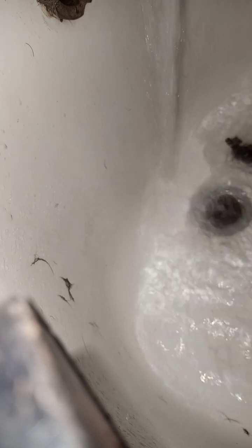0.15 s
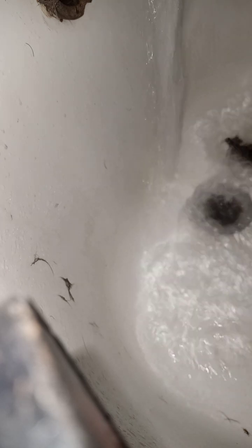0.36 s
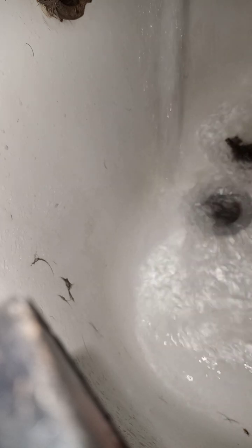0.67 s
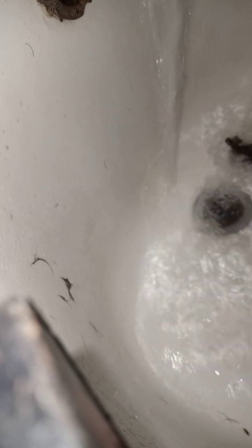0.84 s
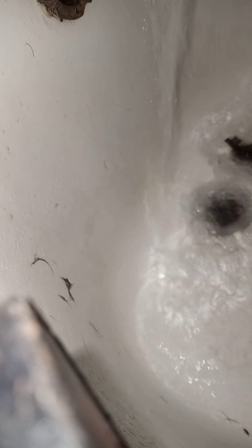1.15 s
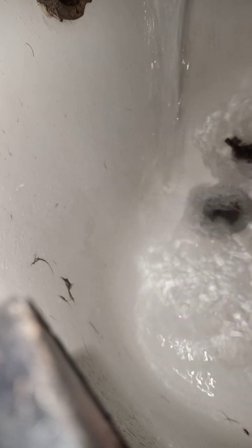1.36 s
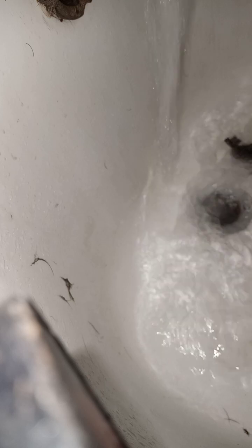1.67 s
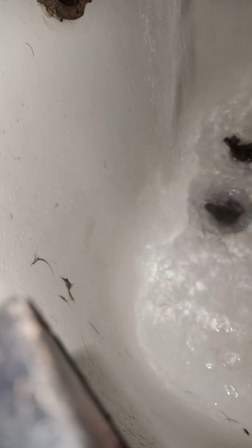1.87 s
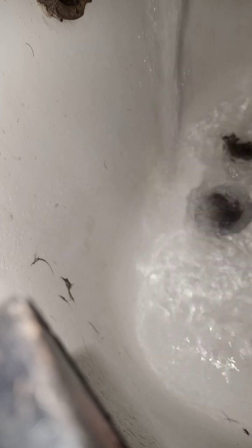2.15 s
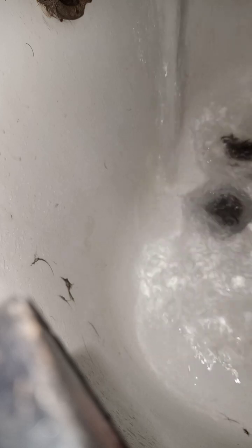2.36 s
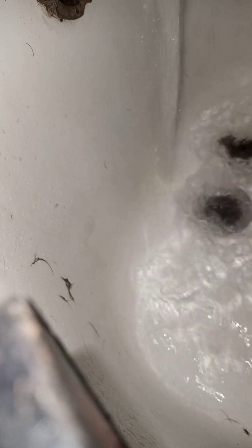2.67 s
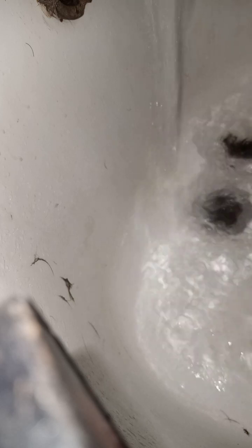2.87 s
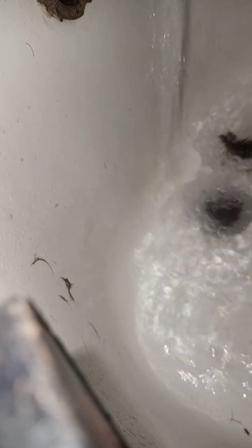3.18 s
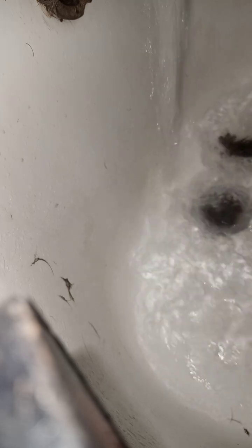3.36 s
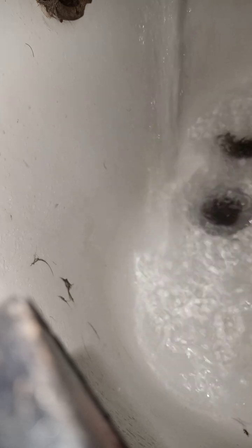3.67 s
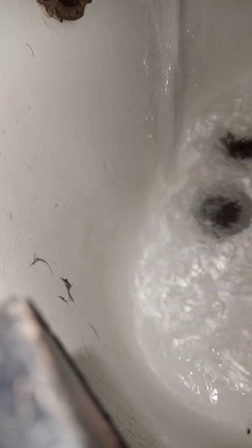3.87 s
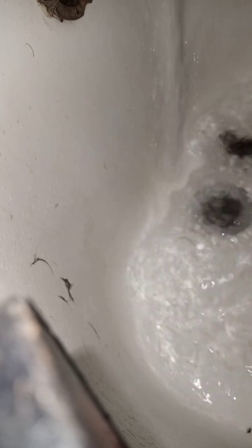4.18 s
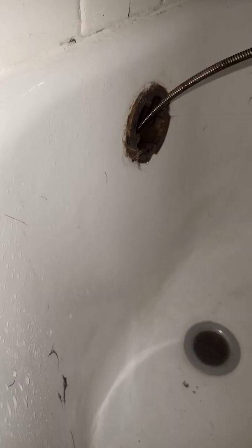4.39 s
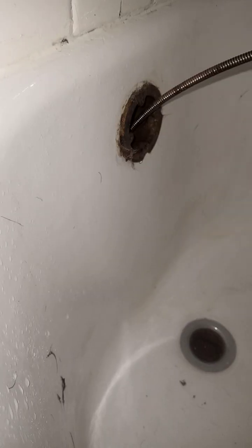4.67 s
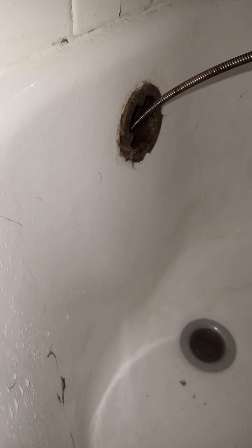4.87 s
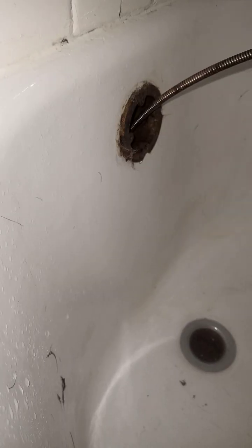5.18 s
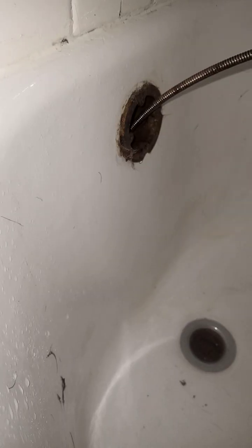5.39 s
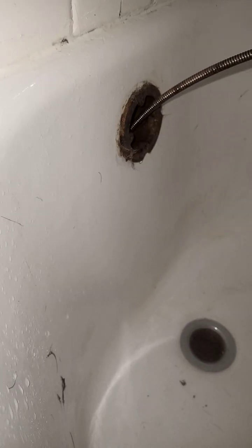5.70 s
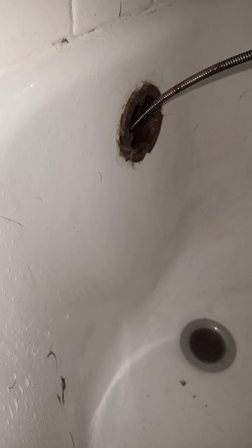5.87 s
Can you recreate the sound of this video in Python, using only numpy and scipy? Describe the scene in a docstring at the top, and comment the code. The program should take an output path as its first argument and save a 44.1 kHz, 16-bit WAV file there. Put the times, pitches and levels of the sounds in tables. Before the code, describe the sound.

A continuous rush of tap water fills the first four seconds, fizzy and dense, with popping bubbles, small gulps and a soft gurgling drain beneath. An abrupt cut leaves near silence and faint house rumble. A metal drain cable scrapes lightly over enamel, pauses, scrapes again, then knocks the tub wall several times with short tiled-room echo. Mono handheld microphone, close, slightly harsh in the treble.

```python
"""A tiled bathroom: water pours from a spout into a bathtub; a hard cut leads to the quiet room, tap shut.
The water is coloured noise for spray and splash, decaying sines for bubbles, and a humming, gurgling drain.
After the cut a steel drain cable scrapes (gritty noise) and knocks on the tub (noise bursts, sines).
Low house rumble and faint room air, both filtered noise, run throughout.
The microphone boosts part of the treble."""
import sys
import numpy as np
from scipy import signal
from scipy.fft import rfft, irfft, next_fast_len
from scipy.io import wavfile
from scipy.ndimage import uniform_filter1d, map_coordinates

SR = 44100
rng = np.random.default_rng(int(sys.argv[2]) if len(sys.argv) > 2 else 0)


def bounce(signal):
    """Save signal as a 16-bit WAV file at the path given by the first command-line argument."""
    frames = np.transpose(np.atleast_2d(signal))
    limited = np.clip(frames, -1, 1)
    pcm = np.round(limited * 32767).astype(np.int16)
    wavfile.write(sys.argv[1], SR, pcm)


N = 266364  # length of the sound [samples]
CUT_S = 3.929  # a cut ends the water scene; a quiet bathroom follows [s]

# how strongly the microphone picks up each pitch: (frequency [Hz], gain [dB])
MIC_GAIN = [(35, -5.5), (70, -2.5), (5000, -1.5), (5400, 5), (6100, 9.5), (6750, 6.5), (7100, -1),
            (8200, -8), (9800, -1.5), (11500, -9.5), (13000, -10.5), (13900, -17), (14600, -1.5),
            (15600, -1.5)]
# standing waves in the tub that water and knocks excite: (frequency [Hz], width [Hz], gain [dB])
TUB_WAVES = [(583, 11, -4.5), (753, 19, -12), (877, 30, -4.5), (1080, 17, -7.5), (1480, 33, -14.5),
             (2466, 35, -5.5), (3080, 30, -0.5), (3160, 93, -4.5), (3440, 19, -3), (3500, 24, -8),
             (3609, 22, -3), (3890, 21, -8)]
# moments when the drain gurgles louder, each led by one big bubble:
# (start [s], length [s], level [dB], bubble pitch [Hz])
DRAIN_GURGLES = [(0.008, 0.028, -45.5, 446), (0.315, 0.027, -44, 514), (0.523, 0.09, -43, 496),
                 (0.851, 0.026, -47, 504), (0.967, 0.048, -46.5, 490), (1.09, 0.028, -43, 492),
                 (1.312, 0.036, -47, 416), (1.398, 0.058, -47, 468), (1.975, 0.03, -46, 476),
                 (2.04, 0.059, -54.5, 464), (2.098, 0.04, -46.5, 444), (2.417, 0.045, -47.5, 434),
                 (2.515, 0.034, -45.5, 450), (2.685, 0.14, -45.5, 459), (3.132, 0.034, -49, 448),
                 (3.204, 0.12, -48, 450), (3.555, 0.3, -47.5, 430)]


def water():
    """Falling water excites the tub and the tiles; the drain sounds along, all until the cut."""
    falling = falling_water()
    in_tub = falling + filtered(falling, resonances(TUB_WAVES))
    near = in_tub + amp(-11.0) * tiles(falling) + drain() + pipe_note()
    after = np.maximum(np.arange(N) / SR - CUT_S, 0)
    # at the cut: a drop of 14 dB at once, then 60 dB more every 25 ms
    ending = np.where(after > 0, amp(-14.0 - 60 * after / .025), 1)
    return near * ending


def falling_water():
    """Spray and splash follow one unsteady flow, with single bursting bubbles and gulps of air on top."""
    # strength of the flow, before random wobble: (time [s], spray level [dB], splash level [dB])
    flow = [(0.0, -30, -38), (0.01, -26, -34), (0.14, -30, -43), (0.6, -27.5, -36), (0.64, -27, -43.5),
            (0.98, -29.5, -38.5), (1.2, -28.5, -42), (1.27, -29, -44), (1.31, -30, -39), (1.66, -28, -40.5),
            (2.13, -29, -37), (2.18, -30, -40), (2.19, -26.5, -33.5), (2.24, -28, -38.5),
            (3.76, -28.5, -38.5), (3.83, -27, -35), (3.9, -29, -43), (3.92, -30.5, -36.5)]
    spray_db, splash_db = curves(flow)
    churn = wobble(35)  # shared by spray and splash
    return spray(spray_db, churn) + splash(splash_db, churn) + pops() + gulps()


def spray(level_db, churn):
    """The hiss of the jet: a crowd of tiny bubbles mixed with patchy noise."""
    # tone of the spray: (frequency [Hz], gain [dB])
    spray_tone = [(1000, -28.5), (2200, -2), (2800, -11.5), (3400, -3), (5000, -2.5), (10000, -4),
                  (17000, -4)]
    fizz = froth(count=18000, low_hz=1940, high_hz=17170, cycles=2.51,
                 spread_db=3.5, most_db=14.0, size=160)
    hiss = unit(coloured(0.66 * fizz + 0.68 * patchy(2.3), spray_tone))
    flicker_db = 1.3 * wobble(11) + 0.66 * churn + 0.91 * wobble(120)
    return hiss * amp(level_db + flicker_db)


def splash(level_db, churn):
    """Lumpier, deeper water noise: larger bubbles mixed with patchy noise."""
    # tone of the splash: (frequency [Hz], gain [dB])
    splash_tone = [(120, -45), (200, -12.5), (278, -14.5), (369, -4.5), (399, -12.5), (432, -6), (473, -5),
                   (815, -4), (1070, 0.5), (1200, -5), (1570, 0.5), (1930, -6.5), (3000, -4.5),
                   (3900, -10.5), (6600, -120)]
    plops = froth(count=2500, low_hz=295.0, high_hz=3564, cycles=1.73,
                  spread_db=3.5, most_db=14.5, size=900)
    lumps = unit(coloured(0.38 * plops + 1.1 * patchy(2.5), splash_tone))
    flicker_db = 1.6 * wobble(12) + 1.2 * churn + 0.58 * wobble(25.07)
    return lumps * amp(level_db + flicker_db)


def pops():
    """Large bubbles burst, each a very short decaying sine."""
    # bursts: (time [s], peak level including the microphone's gain at that pitch [dB], pitch [Hz])
    bursts = [(0.0558, -15, 6400), (0.3018, -16.5, 5880), (0.5926, -17.5, 5850), (0.7043, -11, 6200),
              (0.8816, -15, 5850), (1.0058, -7.5, 6620), (1.0336, -10, 5700), (1.3114, -12.5, 5650),
              (1.5232, -11, 6310), (1.781, -12, 5800), (1.8826, -12.5, 6000), (2.288, -10.5, 6300),
              (2.354, -12.5, 6600), (2.587, -10.5, 6200), (2.789, -12, 5530), (3.037, -9.5, 5660),
              (3.1092, -11.5, 6100), (3.166, -10.5, 5800), (3.3463, -8, 6040), (3.4244, -10.5, 5730),
              (3.47, -8.5, 6210), (3.675, -11, 6280), (3.8864, -8, 5750)]
    s, db, hz = np.transpose(bursts)
    before_mic = amp(db - along(MIC_GAIN, hz))
    return bubbles(s, before_mic, hz, cycles=2.2, rise=0.0015, size=200)


def gulps():
    """Trapped air gulps, each a short decaying sine with a slightly rising pitch."""
    # gulps of trapped air: (time [s], peak level [dB], pitch [Hz])
    air_gulps = [(0.076, -25.5, 1550), (0.177, -20, 3250), (0.282, -23.5, 3620), (0.398, -16, 3440),
                 (0.431, -14, 3440), (0.502, -22, 2480), (0.539, -25.5, 1080), (0.723, -15.5, 4200),
                 (0.783, -28, 1590), (1.247, -13, 3510), (1.285, -18, 3170), (1.433, -19.5, 2550),
                 (1.547, -29, 1090), (1.734, -18.5, 3610), (1.832, -18, 3610), (1.867, -19.5, 1420),
                 (2.087, -21, 3080), (2.191, -15.5, 2200), (2.402, -26, 964), (2.463, -20.5, 1490),
                 (2.696, -26, 993), (2.774, -22, 1530), (3.075, -22, 1470), (3.316, -22.5, 977),
                 (3.418, -14.5, 3610), (3.625, -23, 2540), (3.92, -28.5, 1610)]
    s, db, hz = np.transpose(air_gulps)
    return bubbles(s, amp(db), hz, cycles=1.23, rise=0.0075, size=700)


def drain():
    """Noise makes the air in the pipe and tub hum; big bubbles lead the gurgles, over a lower hum."""
    # resonances of the air in pipe and tub: (frequency [Hz], width [Hz], gain [dB])
    pipe_air = [(378, 27, -5.5), (429.7, 11, 1.5), (514.4, 38, -6)]
    # low modes of the tub: (frequency [Hz], width [Hz], gain [dB])
    low_modes = [(152, 14, 0.5), (238, 19, -5.5)]
    rush = coloured(rng.standard_normal(N), [(60, -16.5), (140, 6)])
    hum = unit(filtered(rush, resonances(pipe_air))) * gurgling() * amp(1.5 * wobble(9.0))
    s, _, db, hz = np.transpose(DRAIN_GURGLES)
    # each bubble peaks 2 dB above the level listed for its gurgle
    leaders = bubbles(s, amp(db + 2), hz, cycles=7, rise=0.015, size=5000)
    low_hum = unit(filtered(rng.standard_normal(N), resonances(low_modes)))
    return hum + leaders + amp(-61 + 1.5 * wobble(6)) * low_hum


def gurgling():
    """Gain of the drain's hum: a steady base, with a swell for every gurgle."""
    base_db, edge_s = -52, .03  # hum between gurgles [dB]; swell and fade of one [s]
    t = np.arange(N) / SR
    start, length, db = np.transpose(DRAIN_GURGLES)[:3, :, None]
    to_nearest_end = np.minimum(t - start, start + length - t)
    swell = np.clip(to_nearest_end / edge_s + .5, 0, 1)
    return amp(base_db) + (amp(db) * swell).sum(axis=0)


def pipe_note():
    """A half-closed drain pipe sings: slightly unsteady tones that swell in and out."""
    # notes, before random wobble: (start [s], length [s], pitch [Hz], peak level [dB])
    notes = [(2.74, 0.08, 441, -43.5), (3.116, .22, 440, -43), (3.554, .16, 428, -39.5),
             (3.695, 0.19, 431, -37)]
    t, out = np.arange(N) / SR, np.zeros(N)
    for start, length, hz, db in notes:
        swell = np.sin(np.pi * np.clip((t - start) / length, 0, 1))
        level = amp(db + 2.0 * wobble(40))
        turns = np.cumsum(hz + 5 * wobble(50)) / SR
        out += swell * level * np.sin(2 * np.pi * turns)
    return out


def scrape():
    """The coiled cable drags over enamel: bright gritty noise, with more low grit in the duller strokes."""
    # strokes: (start [s], attack [s], hold [s], fade by 60 dB [s], level [dB], dullness [0-1])
    cable_strokes = [(4.051, 0.062, .015, .22, -53.5, 0.1), (4.099, .2, 0.027, .035, -53.5, 0.1),
                     (4.35, 0.029, 0.0086, 0.35, -77, 0.28), (4.5, .1, 0.051, 0.33, -83.5, 0.4),
                     (4.72, 0.078, 0.028, .35, -73, .3), (5.05, .06, .03, .3, -92, .3),
                     (5.405, 0.052, 0.072, 0.15, -52, 0.22), (5.522, .03, .005, .08, -61, 0.5),
                     (5.503, .07, 0.24, .3, -69, 0.6)]
    # bright tone of steel on enamel: (frequency [Hz], gain [dB])
    enamel_tone = [(600, -25), (1500, -13), (2200, -1.5), (4000, 3), (7000, 1), (8500, -13.5), (11000, -14),
                   (13000, -10), (15500, 1)]
    t = np.arange(N) / SR
    start, attack, hold, release, db, dull = np.transpose(cable_strokes)[:, :, None]
    rise = np.clip((t - start) / attack, 0, 1) ** 2
    since_release = np.maximum(t - start - attack - hold, 0)
    strokes = rise * amp(db - 60 * since_release / release)
    grit = amp(1.1 * wobble(110)) * patchy(2.5)
    bright = unit(coloured(grit, enamel_tone))
    low = unit(coloured(grit, [(700, -7), (1200, -9), (2500, -5), (4000, -13), (7000, -15.5)]))
    dull_strokes = np.clip(dull, 0, 1) * strokes
    return strokes.sum(axis=0) * bright + dull_strokes.sum(axis=0) * low


def knocks():
    """Each contact is a tick, a duller tap, a short ring of the tub wall and a low thud; the tiles answer."""
    # contacts, levels before filtering: (time [s], sharp tick [dB], dull tap [dB], ring of the tub [dB],
    # thud [dB], answer of the room relative to tick and tap [dB])
    contacts = [(4.017, -52, -62, -85, -90, 0), (4.328, -65.5, -53, -81, -80, -1),
                (4.383, -71, -56, -80, -85, 3), (4.403, -85, -59, -70, -80, 17),
                (4.518, -82, -53, -65, -63, 14), (4.61, -86, -61, -85, -86, 3),
                (5.632, -55, -66, -85, -68, 5), (5.757, -57, -33.5, -58, -45, 10),
                (5.77, -50, -33, -63.5, -51.5, 12.5), (5.828, -32, -38, -52, -53, 12),
                (5.833, -41, -29, -34.5, -46, 19.5), (6.034, -56, -49, -64, -75, 11)]
    # ringing of the tub wall: (frequency [Hz], level within the ring [dB], fade by 60 dB [s])
    wall_modes = [(1090, -0.5, 0.067), (2500, 3.5, 0.021)]
    # the low thud: (frequency [Hz], fade by 60 dB [s])
    thud_hz, thud_fade = (310, 0.11)
    # tone of a sharp tick: (frequency [Hz], gain [dB])
    tick_tone = [(1000, 5), (4000, 10), (6200, 6.5), (10500, 7), (13000, -5), (15200, 5)]
    # tone of a dull tap: (frequency [Hz], gain [dB])
    tap_tone = [(250, -21.5), (450, 7.5), (900, 4.5), (1500, 4), (3000, -1), (4500, -5), (9000, -28)]
    ticks, taps, body = np.zeros((3, N + SR))
    t = np.arange(SR // 2) / SR
    fades = amp(-60 * t / [[.012], [.018]])  # tick and tap fall by 60 dB in 12 and 18 ms
    onset = 1 - np.exp(-t / 0.00085)
    ring = sum(amp(db - 60 * t / t60) * np.sin(2 * np.pi * hz * t) for hz, db, t60 in wall_modes)
    sway = 1 + .5 * np.sin(2 * np.pi * 70 * t)  # the panel beats against a neighbouring mode
    thud = amp(-60 * (t / thud_fade) ** 2) * np.sin(2 * np.pi * thud_hz * t)
    thud = thud * (1 - np.exp(-t / 0.0046)) * sway
    for s, tick_db, tap_db, ring_db, thud_db, room_db in contacts:
        at = slice(round(s * SR), round(s * SR) + len(t))
        burst = fades * onset * rng.standard_normal((2, len(t)))
        ticks[at] += amp(tick_db) * (burst[0] + amp(room_db) * tail()[:len(t)])
        taps[at] += amp(tap_db) * (burst[1] + amp(room_db) * tail()[:len(t)])
        body[at] += amp(ring_db) * ring + amp(thud_db) * thud
    contact = coloured(ticks[:N], tick_tone) + coloured(taps[:N], tap_tone)
    return contact + 0.84 * filtered(contact, resonances(TUB_WAVES)) + body[:N]


def rumble():
    """The lumpy low noise of the house and the faint air of the room, with two narrow wavering bands."""
    # tone of the house: (frequency [Hz], gain [dB])
    house_tone = [(25, -38.5), (49, -26), (66, -12), (88, -3.5), (115, -5.5), (147, -7.5), (190, -30.5),
                  (260, -62)]
    # tone of the room air: (frequency [Hz], gain [dB])
    air_tone = [(150, -17.5), (250, -3), (345, 1), (450, -5.5), (600, -14.5), (1240, -20), (5000, -28.5),
                (5300, -30.5), (6800, -35), (8000, -36), (14000, -33), (15000, -28), (15800, -40)]
    # narrow bands in the air, applied twice: (frequency [Hz], width [Hz], gain of one pass [dB])
    air_bands = [(5530, 250, 0), (6550, 400, -1)]
    house_db, air_db, bands_db = -64, -70, -93  # levels before wobble [dB]
    lumps = amp(3.5 * wobble(11)) * rng.standard_normal(N)
    house = amp(house_db + 1.5 * wobble(4)) * unit(coloured(lumps, house_tone))
    once = filtered(patchy(3), resonances(air_bands))
    bands = unit(filtered(once, resonances(air_bands)))
    air = amp(air_db + 1.1 * wobble(6)) * unit(coloured(patchy(1.5), air_tone))
    return house + air + amp(bands_db + 3 * wobble(4.6)) * bands


def tiles(x):
    """A sound heard once more off the tiled walls."""
    return signal.fftconvolve(x, tail())[:N]


def tail():
    """The room's answer to one click, energy 1: noise in which each frequency dies at its own speed."""
    # how long the tiled room rings: (frequency [Hz], fade by 60 dB [s])
    ring_times = [(200, .7), (1000, 0.61), (4000, 0.41), (10000, .42), (12500, 0.29), (15000, 0.25)]
    hz, t, z = signal.stft(rng.standard_normal(SR // 2), SR, nperseg=256)
    fade = amp(-60 * t / along(ring_times, hz)[:, None])
    echo = signal.istft(z * fade, SR, nperseg=256)[1]
    echo = echo * (1 - np.exp(-np.arange(len(echo)) / SR / 0.0026))  # reflections take a moment to gather
    return echo / np.linalg.norm(echo)


def froth(count, low_hz, high_hz, cycles, spread_db, most_db, size):
    """A crowd of random bubbles, most quiet and a few loud, whose peaks grow with pitch."""
    when, pitch, chance = rng.random((count, 3)).T
    hz = low_hz * (high_hz / low_hz) ** pitch
    loudness_db = np.minimum(-spread_db * np.log(1 - chance), most_db)
    peak = hz / high_hz * amp(loudness_db)
    return unit(bubbles(when * CUT_S, peak, hz, cycles, 0.054, size=size))


def bubbles(s, peak, hz, cycles, rise, size):
    """Damped sines with a soft start whose pitch at first climbs as the bubble nears the surface."""
    turns = np.arange(size) / SR * np.reshape(hz, (-1, 1))
    u = turns / cycles  # 1 at the loudest moment
    climb = 1 + rise * np.minimum(u, 3)
    shape = np.sin(2 * np.pi * turns * climb) * u * np.exp(1 - u)
    at = (np.reshape(s, (-1, 1)) * SR).astype(int) + np.arange(size)
    scaled = shape * np.reshape(peak, (-1, 1))
    return np.bincount(at.ravel(), scaled.ravel(), N + size)[:N]


def patchy(depth_db):
    """White noise with patches of random gain in time and frequency."""
    z = signal.stft(rng.standard_normal(N), nperseg=256)[2]
    field = uniform_filter1d(rng.standard_normal(z.shape), size=5, axis=0)
    field = uniform_filter1d(field, size=10, axis=1)
    return unit(signal.istft(z * amp(depth_db * unit(field)), nperseg=256)[1][:N])


def resonances(modes):
    """The summed response of modes (frequency [Hz], width [Hz], gain [dB]), each ringing at its pitch."""
    return lambda f: sum(amp(db) * 1j * f * w / (c * c - f * f + 1j * f * w) for c, w, db in modes)


def coloured(x, points):
    """A filter with the gain of (frequency [Hz], gain [dB]) points that never sounds ahead of its input."""
    def response(hz):
        # folding the cepstrum gives the phase that belongs to a filter without pre-echo
        cepstrum = irfft(np.log(amp(along(points, hz)) + 1e-6))
        cepstrum[1:len(hz) - 1] *= 2
        cepstrum[len(hz):] = 0
        return np.exp(rfft(cepstrum))
    return filtered(x, response)


def filtered(x, response):
    """Multiply the spectrum of x by a complex response of frequency."""
    m = 2 * next_fast_len(N // 2 + SR // 4)
    return irfft(rfft(x, m) * response(np.fft.rfftfreq(m, 1 / SR)), m)[:N]


def wobble(rate):
    """A smooth random curve shaped by rate random points a second."""
    knots = rng.standard_normal(int(N * rate / SR) + 4)
    return map_coordinates(knots, [np.arange(N) * rate / SR])


def curves(rows):
    """One value per sample for each column after the time, along straight lines."""
    s, *cols = np.transpose(rows)
    return [np.interp(np.arange(N) / SR, s, c) for c in cols]


def along(points, hz):
    """Read a value between (frequency [Hz], value) points, on a logarithmic frequency axis."""
    f, v = np.transpose(points)
    return np.interp(np.log(hz + 1), np.log(f + 1), v)


def amp(db):
    """Turn decibels into a factor."""
    return 10 ** (np.asarray(db) / 20)


def unit(x):
    """Scale a signal to an average strength (RMS) of 1."""
    return x / np.sqrt(np.mean(x ** 2) + 1e-20)


def scene():
    """Water, cable scrapes, knocks and house rumble together, in one channel."""
    return (water() + scrape() + knocks() + rumble())[None]


def record(dry):
    """The microphone port resonates in the treble; the highest treble is removed."""
    def edge(hz):
        # full gain up to 15700 Hz, silence from 15860 Hz
        return np.sin(np.pi / 2 * np.clip((15860 - hz) / 160, 0, 1)) ** 2
    return filtered(coloured(dry[0], MIC_GAIN), edge)[None]


dry = scene()
out = record(dry)
bounce(out)
```